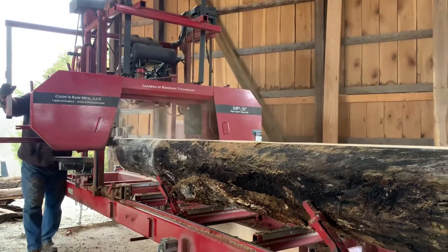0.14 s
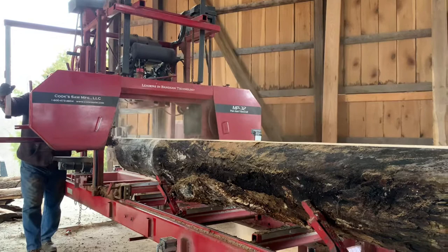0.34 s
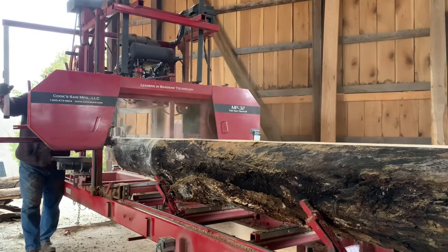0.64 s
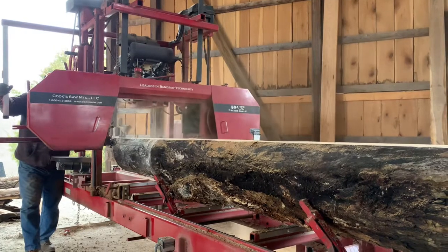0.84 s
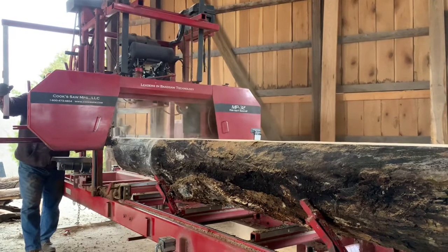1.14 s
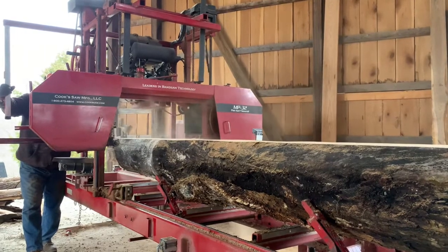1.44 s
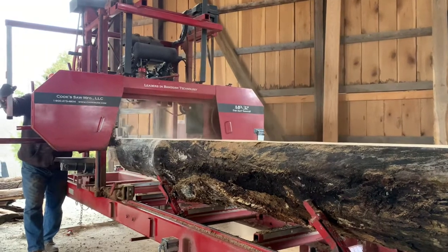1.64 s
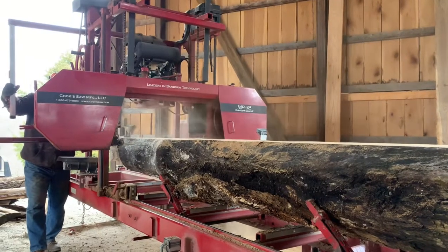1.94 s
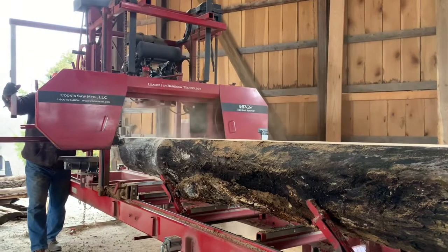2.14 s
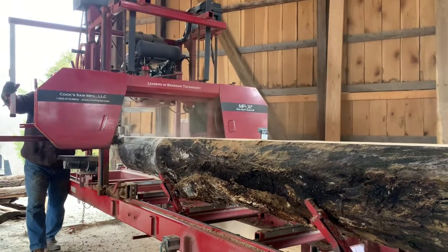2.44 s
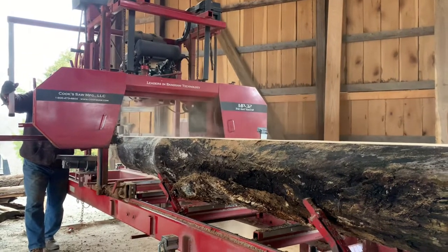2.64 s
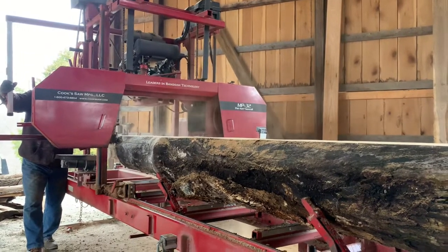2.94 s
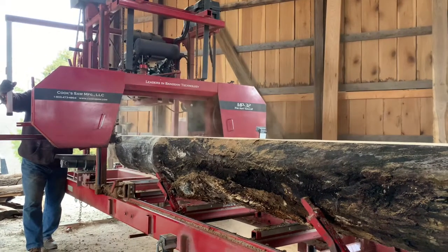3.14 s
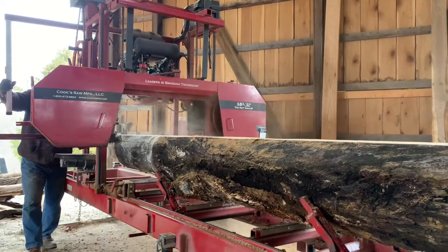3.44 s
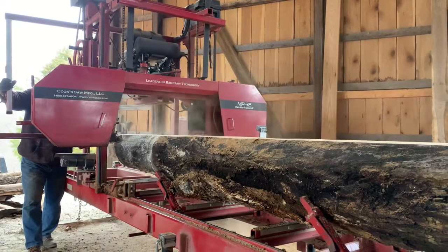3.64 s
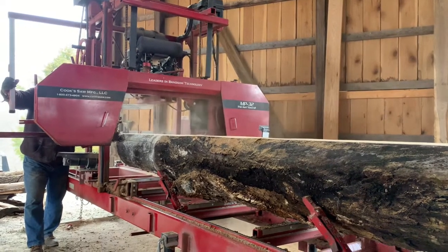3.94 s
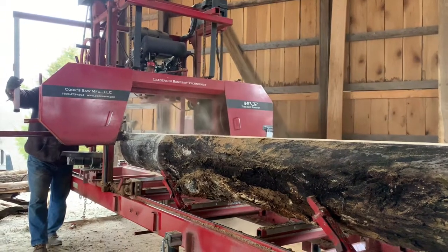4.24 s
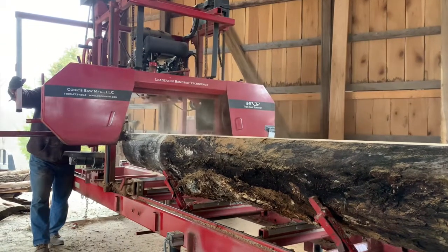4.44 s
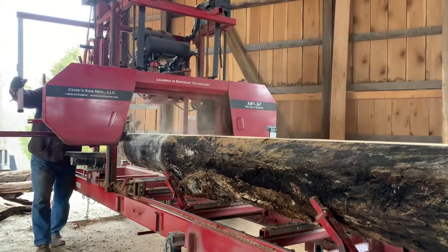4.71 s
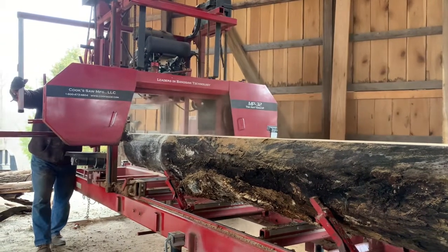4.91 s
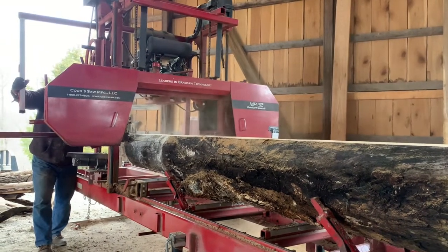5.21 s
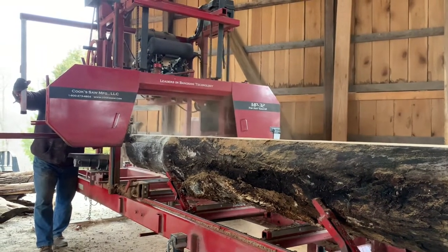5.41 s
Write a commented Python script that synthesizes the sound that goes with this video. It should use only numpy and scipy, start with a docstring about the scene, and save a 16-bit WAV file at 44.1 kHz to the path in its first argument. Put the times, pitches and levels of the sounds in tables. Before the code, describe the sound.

Continuous rough engine clatter and low wavering drone, with a sharp metallic sawing hiss on top, slowly growing louder in a wooden barn.

```python
"""A petrol bandsaw mill saws along a log in a timber barn, all sources running from the start.
Two uneven firings a cycle make the clatter; low orders drone and high orders whine as the governor hunts.
A steady shaft hums underneath. Tooth snaps ring the blade, surging once a lap and growing slowly.
The speed sags near 0.2, 1.3, 2.6, 3.9 and 5.1 s; the whine sings out near 0.3, 2.4 and 2.9 s."""
import sys
import numpy as np
from scipy import signal
from scipy.fft import rfft, irfft, next_fast_len
from scipy.io import wavfile

SR = 44100
rng = np.random.default_rng(int(sys.argv[2]) if len(sys.argv) > 2 else 0)


def file_out(sig):
    """Save sig as 16-bit WAV at sys.argv[1]."""
    # one column per channel
    cols = np.atleast_2d(sig).T
    # limit, then scale
    lim = np.clip(cols, -1, 1)
    pcm = np.round(lim * 32767).astype(np.int16)
    wavfile.write(sys.argv[1], SR, pcm)


N = 245617

TIME = np.arange(N) / SR
FFT_SIZE = next_fast_len(N)
BINS_HZ = np.maximum(np.fft.rfftfreq(FFT_SIZE, 1 / SR), 1)
SIDES = np.array([[1], [-1]])  # left, right

# engine speed in four-stroke cycles per s
GOVERNED_HZ, FULL_SPEED_HZ = 28, 28.638
LAPS_PER_CYCLE = .1904
SHAFT_HZ = 37.6
FIRING_JITTER_CYCLES, FIRING_SPREAD_DB = .015, 1.1
PUFF_DB = -13  # gas puffs, before the rush of air is added
# throttle: dB gained while the speed climbs by one cycle per s each second
CLATTER_DB, CLATTER_THROTTLE_DB = -31, 0.15
HISS_START_DB, HISS_RISE_DB_PER_S = -28.5, 0.22
PORT_DELAY_S = .000214
CUTOFF_HZ = 15750


def from_db(db):
    """Decibels to gain."""
    return 10 ** (np.asarray(db) / 20)


def rms_one(x):
    """Scale to unit rms."""
    return x / np.sqrt(np.mean(x ** 2) + 1e-20)


def at_bins(rows):
    """One curve over log frequency for each column after the first."""
    hz, *columns = np.transpose(rows)
    return [np.interp(np.log(BINS_HZ), np.log(hz), column) for column in columns]


def filtered(x, response):
    """Apply a frequency response."""
    return irfft(rfft(x, FFT_SIZE) * response, FFT_SIZE)[..., :N]


def drift(rate_hz):
    """Slow chance with spread 1, drawn on a coarse time grid."""
    size = min(N, int(32 * rate_hz * N / SR) + 2)
    hz = np.fft.rfftfreq(size, N / SR / size)
    spectrum = rfft(rng.standard_normal(size)) / (1 + (hz / rate_hz) ** 2)
    slow = irfft(spectrum, size)
    return np.interp(TIME, np.linspace(0, TIME[-1], size), rms_one(slow))


def bells(rows):
    """Sum of smooth bells: (middle [s], length [s], height)."""
    total = 0
    for middle_s, length_s, height in rows:
        place = np.clip((TIME - middle_s) / length_s, -.5, .5)
        total = total + height * np.cos(np.pi * place) ** 2
    return total


def churn(x, low_hz, high_hz, depth_db, rate_hz, count):
    """Neighbouring bands, evenly spaced in log frequency, swell and sink each on their own."""
    place = np.interp(np.log(BINS_HZ), np.log([low_hz, high_hz]), [0, count - 1])
    spectrum = rfft(x, FFT_SIZE)
    out = 0
    for k in range(count):
        band = irfft(spectrum * np.maximum(1 - abs(place - k), 0), FFT_SIZE)[..., :N]
        out = out + band * from_db(depth_db * drift(rate_hz))
    return out


def body(spectrum, modes):
    """A broad colour with narrow resonances standing out of it."""
    peaks = 0
    for hz, width_hz, db in modes:
        peaks = peaks + from_db(db) ** 2 / (1 + (2 * (BINS_HZ - hz) / width_hz) ** 2)
    return from_db(at_bins(spectrum)[0]) * np.sqrt(1 + peaks)


def barn(x, t60_s=0.49, direct_db=-11.5):
    """Direct sound plus a dense decaying tail of wall reflections, at unit rms."""
    tail = rng.standard_normal(N) * from_db(-60 * TIME / t60_s)
    echo = rfft(tail / np.linalg.norm(tail), FFT_SIZE)
    return rms_one(filtered(x, from_db(direct_db) + echo))


def at_ports(direct, diffuse):
    """Direct sound reaches two microphone ports with a phase offset; diffuse sound makes them differ."""
    # (frequency [Hz], left lead [rad], likeness [0-1], left over right [dB])
    port_rows = [(100, 0.12, 0.98, -1.0), (400, 0.42, 0.91, 0), (800, 0.63, 0.66, 2.0),
                 (1250, 1.2, 0.66, 1.2), (1750, 4.9, 0.3, 0.2), (1950, 6.74, 0.57, -1.2),
                 (2350, 9.19, 0.6, -0.7), (2600, 9.35, 0.75, -0.4), (2950, 9.45, 0.9, -0.2),
                 (3300, 10.4, 0.38, 1.9), (3900, 12.86, 0.26, 1.4), (4700, 12.59, 0.21, -1.8),
                 (5400, 9.9, 0.44, -4.5), (5850, 12.6, 0.3, -1.6), (6400, 12.45, 0.992, 0)]
    lead_rad, alike, tilt_db = at_bins(port_rows)
    # above the last row the right port gains on the left by a plain delay
    lead_rad = lead_rad - 2 * np.pi * PORT_DELAY_S * np.maximum(BINS_HZ - port_rows[-1][0], 0)
    alike = np.clip(alike, 0, .995)
    common = filtered(direct, np.sqrt(1 + alike))
    opposed = SIDES * filtered(diffuse, np.sqrt(1 - alike))
    response = from_db(SIDES * tilt_db / 2) * np.exp(1j * SIDES * lead_rad / 2)
    return rms_one(filtered(common + opposed, response))


def drone(cycles, speed_hz, boom_db, waver_db=0.34, rough_rad=0.033, port_rad=0.11):
    """Low exhaust orders: sines locked to the cycle, their levels following the hunting speed."""
    # standing waves in the barn: (order, level [dB] at governed speed, slope [dB per cycle/s])
    order_levels = [(2, -50.3, 0.3), (3, -42.9, 2.9), (4, -45.3, -6.9), (6, -38, -6.6), (7, -58, 1.5),
                    (8, -47.5, 5.5), (9, -44.3, -4.6), (10, -54, 5.3), (11, -55, -3.5)]
    levels = [(5, boom_db)]
    for order, db, slope_db in order_levels:
        levels.append((order, db + slope_db * (speed_hz - GOVERNED_HZ)))
    out = 0
    for order, level_db in levels:
        # uneven combustion blurs the higher orders most
        blur_rad = rough_rad * order * drift(20)
        angle = 2 * np.pi * (order * cycles + rng.random()) + blur_rad + port_rad * SIDES
        gain = from_db(level_db + waver_db * drift(11))
        out = out + gain * np.sqrt(2) * np.sin(angle)
    return out


def shaft(waver_db=0.5, upper_waver_db=3.0, wobble_rad=0.059, port_rad=0.15):
    """Multiples of a steady turning rate; a slight wobble makes the high ones flutter."""
    # (multiple of the turning rate, level [dB])
    shaft_levels = [(1, -55.5), (2, -38), (4, -52), (6, -47.5), (8, -52), (12, -53.5), (14, -58),
                    (15, -55.5), (16, -58), (18, -57), (22, -60), (32, -60), (38, -59), (45, -61)]
    turn_rad = 2 * np.pi * SHAFT_HZ * TIME + wobble_rad * drift(5)
    out = 0
    for multiple, db in shaft_levels:
        angle = multiple * turn_rad + 2 * np.pi * rng.random() + port_rad * SIDES
        depth_db = waver_db if multiple <= 4 else upper_waver_db
        gain = from_db(db + depth_db * drift(5))
        out = out + gain * np.sqrt(2) * np.sin(angle)
    return out


def clatter(cycles, second_firing=.39, puff_s=0.026, crack_db=-8.5, rush_db=0.0):
    """Two uneven firings a cycle: each a sharp crack and a puff of gas, over rushing cooling air."""
    # engine colour: (frequency [Hz], relative level [dB per Hz])
    engine_colour = [(20, -27), (45, -18), (100, -10), (190, 0.5), (320, -1.5), (450, -4.5), (620, -7.5),
                     (800, -11), (1050, -9), (1400, -10), (1800, -13.5), (2400, -13), (4000, -19.5),
                     (9000, -19)]
    # ringing frame and guards: (frequency [Hz], width [Hz], level over the noise [dB])
    frame_modes = [(215, 8, 6), (324, 24, -6), (400, 24, -6), (442, 18, -1), (570, 50, -5), (674, 14, -4),
                   (830, 24, -2), (1245, 70, -2), (1350, 60, -4), (1500, 30, -1), (1575, 35, -1),
                   (1700, 40, 1.5), (1960, 80, 1), (2380, 90, -3)]
    firings = 0
    for lag_cycles in (0, second_firing):
        count = np.floor(cycles + lag_cycles)
        firings = firings + np.diff(count, prepend=count[0])
    cracks = firings * from_db(FIRING_SPREAD_DB * rng.standard_normal(N))

    puffs = rms_one(signal.lfilter([1], [1, -np.exp(-1 / (puff_s * SR))], cracks))
    gas_level = np.hypot(from_db(PUFF_DB) * puffs, from_db(rush_db))
    gas = gas_level * rng.standard_normal((2, N))
    gas = churn(gas, low_hz=190, high_hz=2540, depth_db=2.9, rate_hz=12, count=20)  # turbulence

    # the lowest orders leave by the pipe; the cracks carry only the upper ones
    cracks = signal.sosfilt(signal.butter(8, 290, "high", fs=SR, output="sos"), cracks)
    # the muffler dulls them
    cracks = signal.sosfilt(signal.butter(2, 1800, fs=SR, output="sos"), cracks)
    paths = gas + from_db(crack_db) * np.array([barn(cracks), barn(cracks)])
    direct, diffuse = filtered(paths, body(engine_colour, frame_modes))
    return at_ports(direct, diffuse)


def whine(cycles, speed_hz, width_hz=22, fade_db=2.5, rough_rad=1.0, port_rad=0.4):
    """Mechanical whine: high engine orders swell as the speed carries them through panel resonances."""
    # (order, peak amplitude [dB] at resonance, panel resonance [Hz], share of the swells)
    whine_orders = [(34, -45, 954, 1), (36, -47.5, 1001, .6), (48, -48, 1335, .3)]
    # the whine sings out briefly: (middle [s], length [s], rise [dB])
    swells = [(0.33, 0.5, 2.5), (2.38, 0.45, 4.5), (2.92, 0.4, 2.5)]
    swell_db = bells(swells)
    out = 0
    for order, level_db, panel_hz, share in whine_orders:
        resonance = 1 / np.hypot(1, 2 * (order * speed_hz - panel_hz) / width_hz)
        angle = 2 * np.pi * (order * cycles + rng.random()) + rough_rad * drift(6.3) + port_rad * SIDES
        gain = from_db(level_db + share * swell_db + fade_db * drift(8.4))
        out = out + gain * resonance * np.sin(angle)
    return out


def blade(laps, grain_db=0.6, uneven_bite=0.25):
    """Teeth tear fibres in tiny snaps (noise) that ring the steel; the bite varies along the band."""
    # cut colour: (frequency [Hz], relative level [dB per Hz])
    hiss_colour = [(800, -24), (2800, -13.5), (4200, -15.2), (5200, -9.7), (5900, -10.7), (6900, -9),
                   (7400, -3.7), (8300, -1.4), (9300, -1), (10200, -2.6), (11200, -3.8), (12900, -3.8),
                   (13600, -6), (15700, -7.8)]
    # ringing blade: (frequency [Hz], width [Hz], level over the noise [dB])
    blade_modes = [(2790, 70, 7), (3310, 100, 0), (3850, 60, -1), (4380, 65, 1), (4530, 50, -3),
                   (4960, 80, 3), (5250, 160, -6), (6210, 70, -2), (6906, 70, 0), (7290, 55, 4),
                   (7530, 130, 1), (7680, 60, -2), (8020, 60, 3), (8110, 60, 1), (8470, 160, -1),
                   (9450, 130, -3), (9854, 50, -4), (10350, 160, -5), (11590, 110, -2), (11950, 140, -5)]
    # bite along the band: (share of a lap, level [dB])
    bite = [(.04, 1.0), (.22, 0), (.55, -.3), (.72, -.2), (.83, -.65), (.93, .35)]
    share, bite_db = np.transpose(bite)
    lap_db = np.interp(laps, share, bite_db, period=1) * (1 + uneven_bite * drift(2.9))
    snaps = rng.standard_normal((2, N)) * from_db(grain_db * drift(3000) + lap_db)
    # bands of the rasp swell and sink as the teeth meet changing grain
    cut = churn(snaps, low_hz=2400, high_hz=15000, depth_db=1.9, rate_hz=30, count=48)
    direct, diffuse = filtered(cut, body(hiss_colour, blade_modes))
    return at_ports(direct, diffuse)


def scene():
    """Engine, shaft and blade together; the engine drives the band by a belt."""
    # the governor hunts: (bottom of the sag [s], length [s], depth [cycles per s])
    sags = [(0.163, 1.236, .862), (1.328, 1.068, 1.166), (2.61, 1.468, .952), (3.864, 1.173, 1.121),
            (5.091, 1.175, 1.077)]
    # booming fifth order: (time [s], level [dB])
    boom = [(0.0, -31.5), (0.43, -31.5), (0.7, -37.5), (0.92, -40.5), (1.18, -31.5), (1.28, -35),
            (1.66, -31.5), (1.9, -40.5), (2.18, -33), (2.99, -31), (3.29, -41), (3.52, -35.5),
            (3.86, -37.5), (4.02, -31.5), (4.3, -33.5), (4.44, -48), (4.58, -41), (4.78, -39.5),
            (4.95, -34.5), (5.04, -40.5), (5.13, -33), (5.48, -31.5), (5.57, -35)]
    speed_hz = FULL_SPEED_HZ - bells(sags)
    climb_hz_per_s = np.gradient(speed_hz, TIME)
    cycles = np.cumsum(speed_hz) / SR
    boom_db = np.interp(TIME, *np.transpose(boom))

    exhaust = drone(cycles, speed_hz, boom_db) * from_db(-.35 * SIDES)
    hum = shaft() * from_db(-.8 * SIDES)

    firing_cycles = cycles + FIRING_JITTER_CYCLES * drift(25)
    clatter_db = CLATTER_DB + CLATTER_THROTTLE_DB * climb_hz_per_s
    engine = from_db(clatter_db) * clatter(firing_cycles) + whine(cycles, speed_hz)

    hiss_db = HISS_START_DB + HISS_RISE_DB_PER_S * TIME
    saw = from_db(hiss_db) * blade(LAPS_PER_CYCLE * cycles)
    return exhaust + hum + engine + saw


def record(dry):
    """The top is cut steeply."""
    return filtered(dry, 1 / np.sqrt(1 + (BINS_HZ / CUTOFF_HZ) ** 900))


dry = scene()
out = record(dry)
file_out(out)
```